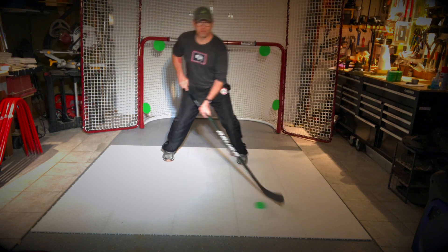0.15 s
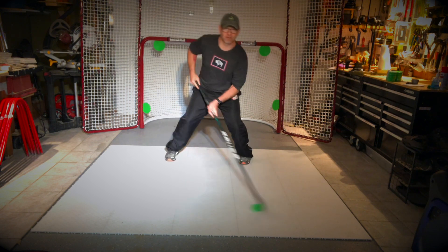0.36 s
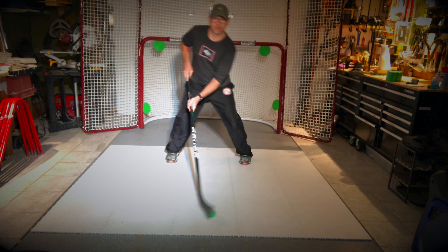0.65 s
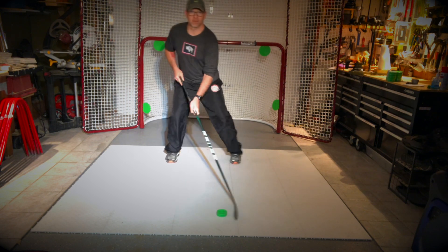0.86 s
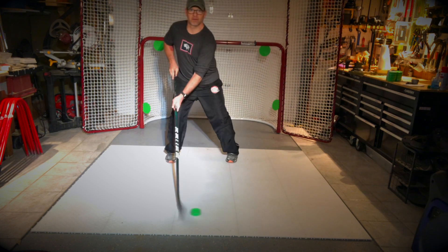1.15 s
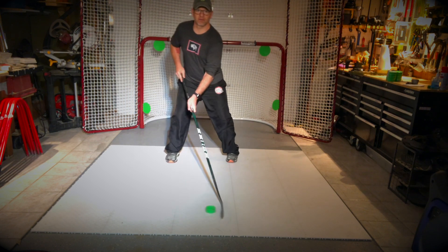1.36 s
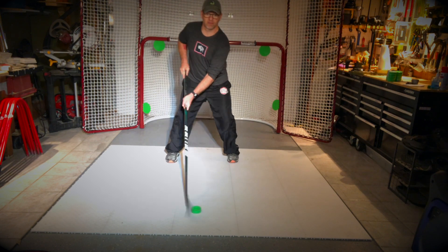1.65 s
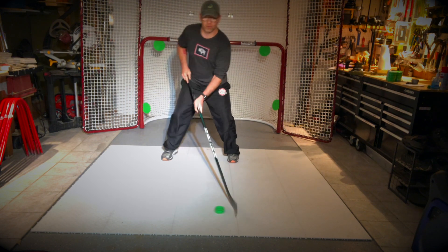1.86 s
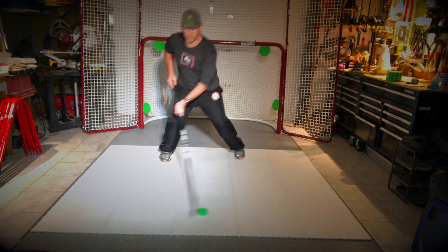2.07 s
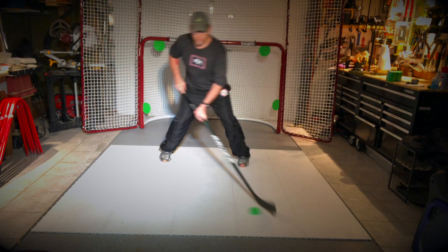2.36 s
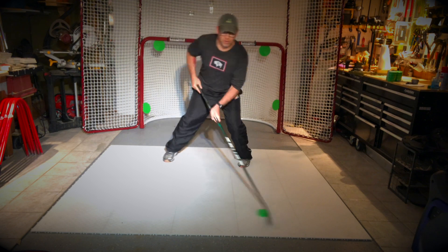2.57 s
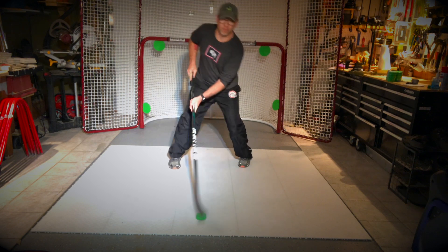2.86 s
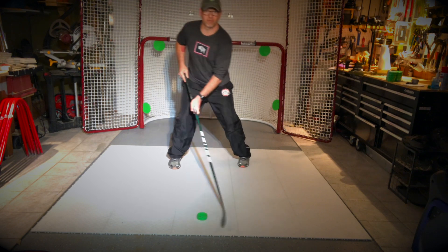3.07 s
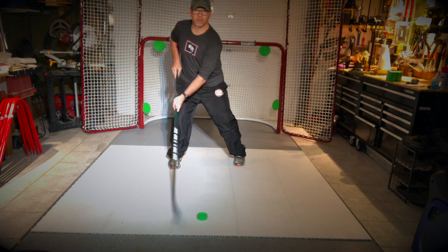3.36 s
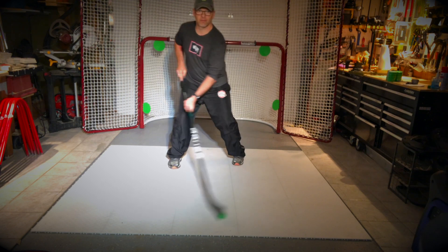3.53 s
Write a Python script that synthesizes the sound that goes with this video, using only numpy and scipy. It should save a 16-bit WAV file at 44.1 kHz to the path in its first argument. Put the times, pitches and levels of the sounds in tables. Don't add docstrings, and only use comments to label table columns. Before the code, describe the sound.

A hockey stick dribbles a hard puck on plastic panels in a reverberant garage, heard from a few metres. A dull tap and bright clack come at 0.2 s, faint contacts near 0.5, then knocks at 0.6 and 0.9. Tap-clack pairs follow about every quarter second until 2.45, then at 2.8, a lone tap at 3.07, and a final pair at 3.4-3.5. Faint scrapes, low panel hum and quiet room hush lie beneath.

```python
import sys
import numpy as np
from scipy import signal
from scipy.fft import rfft, irfft
from scipy.io import wavfile
from scipy.ndimage import uniform_filter1d

SR = 44100
rng = np.random.default_rng(int(sys.argv[2]) if len(sys.argv) > 2 else 0)


def magnitude_from_level(level_db):
    exponent = np.asarray(level_db, float) / 20
    return 10 ** exponent


def digitize_waveform(pressure):
    field = np.atleast_2d(pressure).T
    bounded = np.clip(field, -1, 1)
    quanta = np.round(bounded * 32767).astype(np.int16)
    wavfile.write(sys.argv[1], SR, quanta)


N = 163170
LEAD = SR // 5
HZ = np.fft.rfftfreq(4096, 1 / SR)
EARLIER_S = -0.05
WET_DB = 14

# start_s, blow_db, hardness_db_per_octave, blade_db, tick_db
TAPS = [(0.168, -31, -10, -15, -24), (0.201, -10.5, -4.5, -13.5, -23), (0.599, -15, -5, -7.5, -36),
        (0.888, -13.5, -1.5, -21, -34), (1.153, -17, -2.5, -4.5, -13.5), (1.391, -10, -8, -7.5, -18.5),
        (1.656, -10.5, -0.5, -9, -33), (1.932, -20, -7, -4.5, -11.5), (2.162, -14, -10, -5, -34),
        (2.42, -11.5, -0.5, -10, -21.5), (2.816, -14, 0.5, -9.5, -22), (3.072, -9, -3, -9, -15.5),
        (3.393, -16, -2.5, -9, -13.5)]
# start_s, blow_db, low_db, blade_db, top_db
KNOCKS = [(0.2451, -26, 1, 1, -2.5), (0.4662, -51.5, 5, 4, -9), (0.515, -55, 20, 1, -12),
          (0.599, -24, -7, 2.5, -9), (0.8879, -24, -10.5, 6, -27), (0.9608, -24.5, 8, 4.5, -1.5),
          (1.2137, -21, 3.5, 0.5, -12), (1.455, -23, 6, 4, -12), (1.6553, -29.5, -3, -6, -30),
          (1.694, -27.5, -4, -1, -8), (1.9776, -23.5, 4.5, -1, -3), (2.1723, -24, 10.5, -14, -3),
          (2.3206, -39, 13.5, 10.5, -24), (2.4494, -27, 6, -7, -6), (2.8503, -22, -31, -18, -4),
          (3.487, -23.5, 0.5, 3.5, -8.5)]
# blow_db, low_db, blade_db, top_db
EARLIER_KNOCK = (-27, 8, -3, -6)
# pitch_hz, level_db, t60_s
PANEL_MODES = [(175, -8.5, 0.034), (310, -1, 0.035), (423.3, -3.5, 0.019), (510, 4, 0.021),
               (690, -0.5, .014), (810, 0, 0.0071), (1081, 2.5, 0.01), (1430, -8, 0.0054)]
# pitch_hz, level_db, t60_s
BLADE_MODES = [(1400, -2, .008), (1700, -3, .005), (2050, 0, .01), (2400, -2, .009), (2800, 0, .012),
               (3220, -3, .012), (3630, -3, .012)]
# pitch_hz, level_db, t60_s
PUCK_MODES = [(4250, -2, .007), (5040, -1, .012), (5800, -3, .005), (6400, -4, .004), (7280, 1, .008),
              (7700, -1, .005), (8400, -1, .005)]
# pitch_hz, level_db, t60_s
TOP_MODES = [(9600, -3, .002), (10900, -4, .002), (12300, 1, .005), (13600, -3, .002), (15000, -8, .002)]
# freq_hz, density_db_per_hz
CRACK_SPECTRUM = [(300, -36), (1500, -2), (4000, 1), (8500, -1), (10000, -11), (16000, -16)]
# start_s, pitch_hz, level_db, t60_s
SPOT_NOTES = [(.203, 443, -21.5, 0.017), (0.599, 8120, -31.5, 0.0088), (.89, 844, -27, 0.013),
              (0.959, 3560, -38.5, 0.017), (0.961, 7480, -33.5, 0.016), (1.154, 2810, -26.5, 0.014),
              (1.213, 1464, -27, 0.02), (1.215, 2870, -38, .025), (1.214, 3580, -29, 0.015),
              (1.393, 690, -22, 0.024), (1.393, 2650, -27, 0.0081), (1.454, 7300, -51, 0.015),
              (1.657, 728, -22.5, 0.018), (1.977, 7550, -30, 0.01), (2.171, 5000, -42, 0.014),
              (2.171, 7100, -34.5, .015), (2.817, 510, -19.5, 0.025), (2.850, 5080, -30.5, 0.015),
              (2.849, 3745, -34.5, 0.016), (2.852, 7200, -29.5, 0.015), (3.075, 520, -26.5, 0.031),
              (2.319, 3320, -42, 0.0084), (2.422, 2200, -28, 0.0069), (.6, 2080, -29, 0.011),
              (3.487, 2040, -30.5, 0.022), (3.487, 995, -26, 0.015)]
# start_s, pitch_hz, level_db,
# t60_s
FURTHER_NOTES = [(.203, 990, -23, 0.012), (.246, 400, -28.5, 0.017), (.202, 1500, -29.5, .008),
                 (.6, 1070, -32, 0.009), (1.154, 4960, -39, .003), (1.216, 1150, -31, 0.0065),
                 (1.455, 4870, -32, .008), (2.852, 398, -30.5, .02), (2.321, 514, -37, .015),
                 (.467, 3450, -51, 0.009), (0.601, 510, -31.5, 0.025), (.89, 2340, -24, 0.0067),
                 (.962, 1860, -28.5, .01), (1.155, 515, -28, 0.018), (1.214, 1020, -24.5, 0.014),
                 (1.654, 3940, -27.5, 0.006), (1.657, 2380, -27.5, .006), (1.934, 920, -30.5, 0.011),
                 (1.979, 1004, -27, 0.016), (1.978, 1920, -34.5, .015), (2.164, 1007, -29, 0.053),
                 (2.164, 495, -32, 0.061), (2.32, 5400, -43, 0.0046), (2.342, 474, -33, 0.019),
                 (2.421, 785, -30, 0.013), (2.45, 3780, -35, 0.0087), (2.45, 5020, -35.5, 0.0074),
                 (2.817, 780, -29, 0.012), (2.851, 906, -28.5, 0.01), (3.074, 950, -31.5, 0.0083),
                 (3.394, 764, -27.5, 0.019)]
# start_s, peak_db
SNAPS = [(0.2438, -21), (0.6004, -30), (0.8879, -31), (0.9617, -27), (1.2126, -30), (1.4556, -29),
         (1.6551, -32), (1.9315, -37), (1.9759, -24), (2.171, -23), (2.4204, -32), (2.4483, -18),
         (2.8494, -25), (3.0724, -32), (3.4865, -30)]
# start_s, direct_db
FACING = [(.167, 1.5), (.201, 2.5), (.245, 2.5), (.466, 3), (.515, -4), (.599, -3), (.888, -0.5),
          (.961, 1.5), (1.153, 3.5), (1.214, -2), (1.391, 3.5), (1.455, -0.5), (1.656, 3), (1.694, -2),
          (1.932, 2.5), (1.978, -1), (2.162, -2.5), (2.172, 1.5), (2.32, 3.5), (2.42, 2), (2.449, 4),
          (2.816, 0), (2.85, 2.5), (3.072, 1.5), (3.393, 1), (3.487, -2)]
# time_s, level_db
SLIDE_PRESSURE = [(0, -41.5), (.15, -51.5), (.35, -46), (.45, -51), (.58, -41), (.7, -52), (0.859, -57),
                  (1.5, -52), (1.998, -48.5), (2.299, -43.5), (2.6, -47), (2.7, -50), (2.8, -46.5),
                  (2.951, -68), (3.06, -43.5), (3.2, -77), (3.45, -50), (3.7, -49.5)]
# freq_hz, density_db_per_hz
SCRAPE_SPECTRUM = [(120, -53), (260, -0.5), (520, 6), (750, 1), (1050, 2), (1600, -11.5), (7300, -16.5),
                   (15000, -29)]
# middle_s, half_length_s, level_db
SWEEPS = [
    (0.25, .11, -62.5),
    (2.5, 0.1, -58.5),
    (-1.5, .1, -58),
]
# start_s, level_db
PANEL_HUMS = [(0.202, -27), (0.597, -33.5), (0.889, -31), (1.394, -34), (1.656, -34.5), (1.931, -36),
              (2.161, -27.5), (2.422, -44), (2.816, -63), (3.074, -25), (3.389, -47)]
# delay_s, level_db
ECHOES = [(.0012, -9), (.0026, -10), (.0058, -4.5), (.0085, -13), (.0128, -9), (.017, -12)]
# freq_hz, t60_s
GARAGE_DECAY = [(100, 0.53), (260, 0.47), (700, 0.38), (1840, 0.43), (4850, 0.41), (9000, 0.33),
                (14000, 0.28)]
# pitch_hz, level_db, t60_s
ROOM_MODES = [(81, -14.5, 0.26), (152.4, -22.5, 0.16), (172.5, -16, 0.3), (285.9, -23, 0.63)]
# freq_hz, density_db_per_hz
HUSH_SPECTRUM = [(100, -34), (300, -4), (1000, -7), (2500, -9), (6000, -24), (16000, -42)]
# freq_hz, density_db_per_hz
RUMBLE_SPECTRUM = [(12, -52), (20, -24), (32, -17), (70, -18), (160, -1), (210, -50), (350, -120)]


def evened(x):
    return x / np.sqrt(np.mean(x ** 2) + 1e-20)


def read(points, hz):
    f, value = np.transpose(points)
    return np.interp(np.log(hz + 1), np.log(f + 1), value)


def colour(x, spectrum):
    gain = magnitude_from_level(read(spectrum, np.fft.rfftfreq(len(x), 1 / SR)))
    return irfft(rfft(x) * gain, len(x))


def mode_power(modes, tilt_db=0):
    spread_db, detune = 2.5, 0.012
    power = np.zeros(len(HZ))
    for hz, db, t60_s in modes:
        luck_db, luck_hz = rng.standard_normal(2)
        level_db = db + spread_db * luck_db + tilt_db * np.log2(hz / 600)
        offset = (HZ - hz * (1 + detune * luck_hz)) * t60_s * np.pi / np.log(1000) * 2
        power += magnitude_from_level(2 * level_db) / (1 + offset ** 2)
    return power / power.sum()


def crack_power():
    power = magnitude_from_level(2 * read(CRACK_SPECTRUM, HZ))
    return power / power.sum()


def strike(power, roll_s=0):
    scatter_s, sharp_hz, thud_hz, blow_db = 0.002175, 7070, 1945, 7.5
    fold = irfft(np.log(power * len(HZ) + 1e-12) / 2)
    fold = fold * np.r_[1, 2 * np.ones(len(HZ) - 2), 1, np.zeros(len(HZ) - 2)]
    luck = evened(uniform_filter1d(rng.standard_normal(len(HZ)), size=60))
    delay_s = scatter_s * np.minimum(luck ** 2 / 2, 2) / (1 + (HZ / sharp_hz) ** 2)
    delay_s = delay_s + roll_s / (1 + (HZ / thud_hz) ** 2)
    phase = 2 * np.pi * np.cumsum(delay_s) * HZ[1]
    return irfft(np.exp(rfft(fold) - 1j * phase))[:3000] * magnitude_from_level(blow_db)


def knock(blow_db, low_db, blade_db, top_db):
    tilt_db, crack_db = -2, -0.5
    power = mode_power(PUCK_MODES)
    power = power + magnitude_from_level(2 * low_db) * mode_power(PANEL_MODES, tilt_db)
    power = power + magnitude_from_level(2 * blade_db) * mode_power(BLADE_MODES)
    power = power + magnitude_from_level(2 * top_db) * mode_power(TOP_MODES)
    power = power + magnitude_from_level(2 * crack_db) * crack_power()
    return magnitude_from_level(blow_db) * strike(power)


def garage():
    first_wall_s, onset_s, build_s = 0.0009, 0.00061, 0.004
    taps, t = np.zeros(SR), np.arange(SR) / SR
    at = np.arange(0, SR - 8, 8)
    taps[at + rng.integers(low=0, high=8, size=len(at))] = rng.standard_normal(len(at))
    hz, frame_s, z = signal.stft(taps, SR, nperseg=256)
    decay = magnitude_from_level(-60 * frame_s / read(GARAGE_DECAY, hz)[:, None])
    tail = signal.istft(z * decay, SR, nperseg=256)[1][:SR]
    tail = tail * np.clip((t - first_wall_s) / onset_s, 0, 1) * np.sqrt(1 - np.exp(-t / build_s))
    tail = tail / np.linalg.norm(tail)
    for mode_hz, db, t60_s in ROOM_MODES:
        tail = tail + magnitude_from_level(db - 33 - 60 * t / t60_s) * np.sin(2 * np.pi * mode_hz * t)
    return magnitude_from_level(WET_DB) * tail


def slide():
    grit_per_s, grit_db, flutter_db = 2500, 3.5, 3.5
    t = np.arange(N) / SR
    grit = magnitude_from_level(grit_db * np.minimum(rng.exponential(1, N), 4)) * rng.standard_normal(N)
    grit = grit * (rng.random(N) < grit_per_s / SR)
    time_s, level_db = np.transpose(SLIDE_PRESSURE)
    scrape = evened(colour(grit, SCRAPE_SPECTRUM)) * magnitude_from_level(np.interp(t, time_s, level_db))
    puck_click = strike(mode_power(PUCK_MODES) + 0.6 * mode_power(TOP_MODES))
    rattle = evened(signal.fftconvolve(grit, puck_click)[:N])
    sweep = sum(magnitude_from_level(db) * np.exp(-((t - mid_s) / half_s) ** 4) for mid_s, half_s, db in SWEEPS)
    flutter = magnitude_from_level(flutter_db * evened(uniform_filter1d(rng.standard_normal(N), size=1500)))
    return (scrape + sweep * rattle) * flutter


def hush():
    return magnitude_from_level(-57.5) * evened(colour(rng.standard_normal(N), HUSH_SPECTRUM))


def tap(blow_db, hardness_db, blade_db, tick_db):
    soft_hz, roll_s = 2620, 0.00168
    soft = 1 / (1 + (HZ / soft_hz) ** 2) ** 2
    power = soft * mode_power(PANEL_MODES, hardness_db)
    power = power + magnitude_from_level(2 * blade_db) * mode_power(BLADE_MODES)
    power = power + magnitude_from_level(2 * tick_db) * crack_power()
    return magnitude_from_level(blow_db) * strike(power, roll_s)


def panel_hum():
    hum_hz, t60_s, rise_s = 263, 0.75, 0.01
    t, out = np.arange(SR) / SR, np.zeros(N + SR)
    shape = (1 - np.exp(-t / rise_s)) * np.sin(2 * np.pi * hum_hz * t)
    for s, db in PANEL_HUMS:
        out[round(s * SR):][:SR] += magnitude_from_level(db - 60 * t / t60_s) * shape
    return out[:N]


def chime(hz, db, t60_s):
    t = np.arange(3000) / SR
    return magnitude_from_level(db - 60 * t / t60_s) * np.sin(2 * np.pi * hz * t)


def snaps():
    snap_hz, gain_db, t60_s = 13200, 4, 0.0012
    out = np.zeros(N)
    for s, db in SNAPS:
        out[round(s * SR):][:3000] += chime(snap_hz, db + gain_db, t60_s)
    return out


def facing(s):
    times_s, db = np.transpose(FACING)
    return magnitude_from_level(db[np.argmin(abs(times_s - s))])


def early_echoes(direct):
    out = direct
    for k, (delay_s, db) in enumerate(ECHOES):
        out = out + (-1) ** k * magnitude_from_level(db) * np.roll(direct, round(delay_s * SR))
    return out


def scene():
    length = N + LEAD + SR // 5
    spots, direct = np.zeros((3, length)), np.zeros(length)
    hits = [(s, tap(*settings)) for s, *settings in TAPS]
    hits += [(EARLIER_S, knock(*EARLIER_KNOCK))]
    hits += [(s, knock(*settings)) for s, *settings in KNOCKS]
    blows = [(k % 3, s, sound) for k, (s, sound) in enumerate(hits)]
    blows += [(1, s, chime(*mode)) for s, *mode in SPOT_NOTES]
    blows += [(2, s, chime(*mode)) for s, *mode in FURTHER_NOTES]
    for k, s, sound in blows:
        start = LEAD + round(s * SR)
        spots[k, start:][:len(sound)] += sound
        direct[start:][:len(sound)] += facing(s) * sound
    spots[0, LEAD:LEAD + N] += slide() * magnitude_from_level(-WET_DB)
    wet = sum(signal.fftconvolve(spot, garage())[LEAD:LEAD + N] for spot in spots)
    direct = early_echoes(magnitude_from_level(6.5) * colour(direct, [(3000, 0), (12000, 0)]))
    return (direct[LEAD:LEAD + N] + wet + panel_hum() + snaps() + hush())[None]


def gain_control(x):
    knee_db, squeeze, recover_db_per_s = -31, 0.15, 120
    power_db = 10 * np.log10(abs(uniform_filter1d(x[0] ** 2, size=200, origin=99)) + 1e-12)
    fall_db = np.arange(N) * recover_db_per_s / SR
    held_db = np.maximum.accumulate(power_db + fall_db) - fall_db
    over_db = np.maximum(held_db - knee_db, 0)
    return x / magnitude_from_level(squeeze * uniform_filter1d(over_db, size=100))


def band_limit(x):
    edge_hz, open_edge_hz, open_db = 15720, 16800, 8
    low = signal.oaconvolve(x, signal.firwin(301, edge_hz, fs=SR)[None], "same")
    top = signal.oaconvolve(x, signal.firwin(301, open_edge_hz, fs=SR)[None], "same") - low
    quick, slow = (abs(uniform_filter1d(top ** 2, size=size)) + 1e-12 for size in (200, 2000))
    return low + top * np.clip((10 * np.log10(quick / slow) - open_db) / 2 + 0.5, 0, 1)


def top_cut(x):
    return signal.sosfilt(signal.butter(12, 16970, fs=SR, output="sos"), x)


def record(dry):
    low_cut = signal.butter(2, 364, "high", fs=SR, output="sos")
    x = gain_control(signal.sosfilt(low_cut, dry))
    x = x + magnitude_from_level(-69.5) * evened(colour(rng.standard_normal(N), RUMBLE_SPECTRUM))
    return top_cut(band_limit(x))


dry = scene()
out = record(dry)
digitize_waveform(out)
```